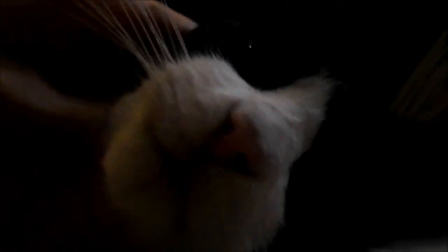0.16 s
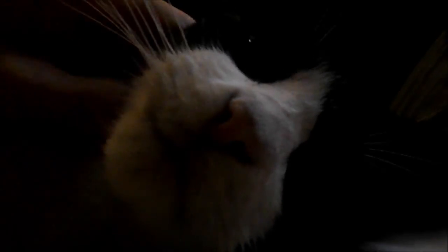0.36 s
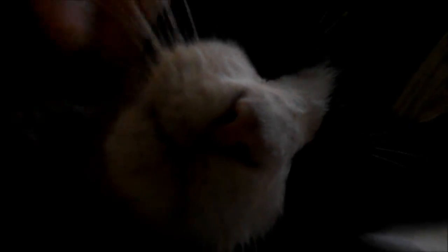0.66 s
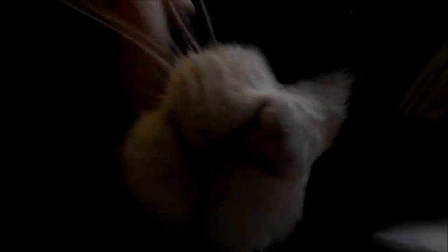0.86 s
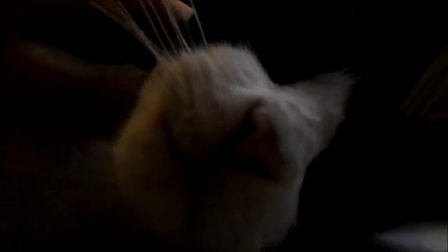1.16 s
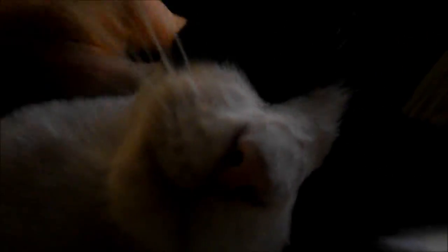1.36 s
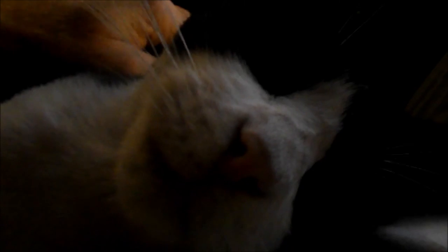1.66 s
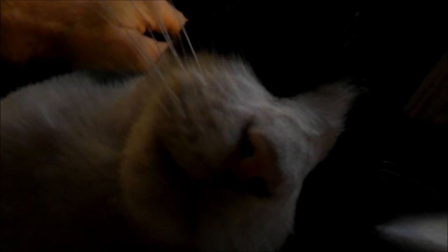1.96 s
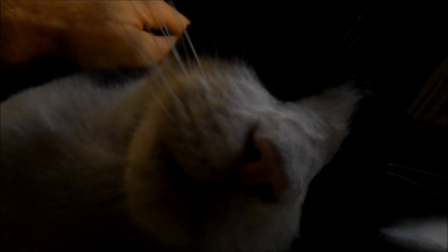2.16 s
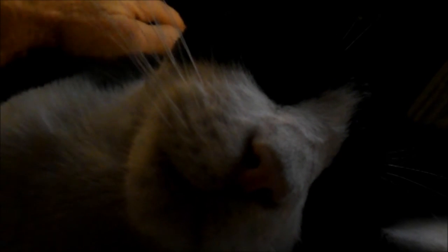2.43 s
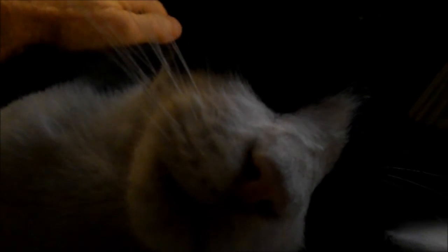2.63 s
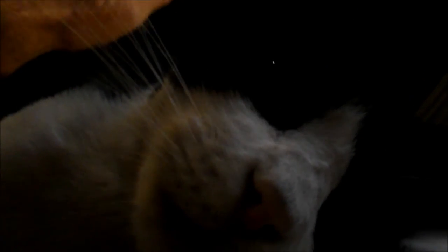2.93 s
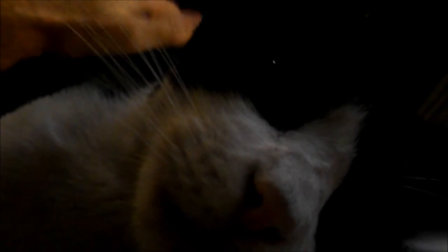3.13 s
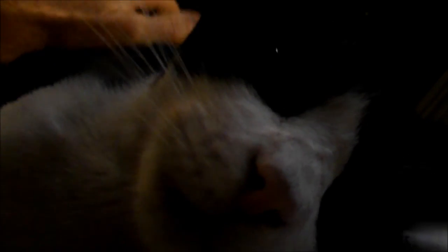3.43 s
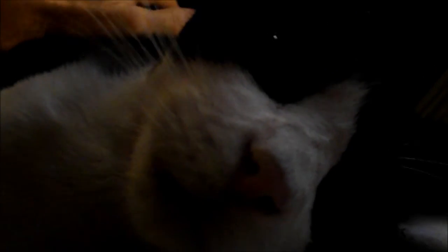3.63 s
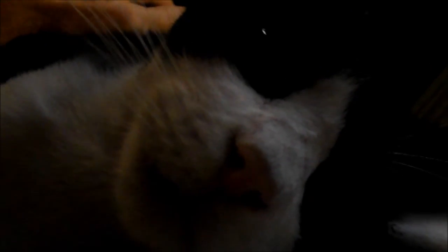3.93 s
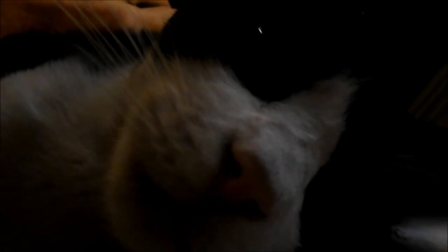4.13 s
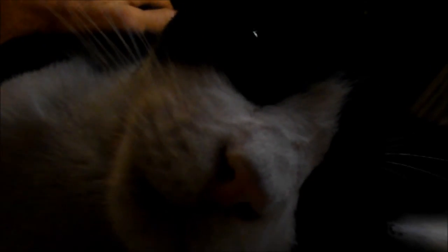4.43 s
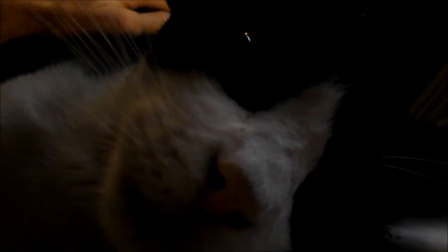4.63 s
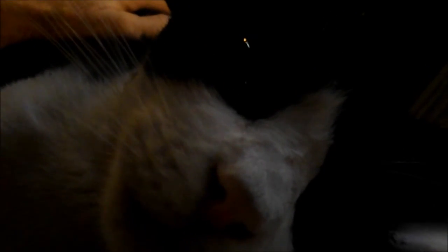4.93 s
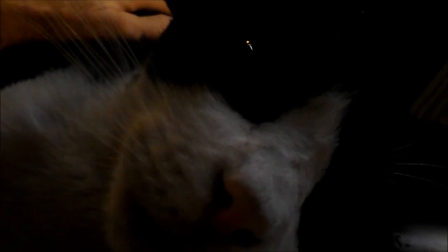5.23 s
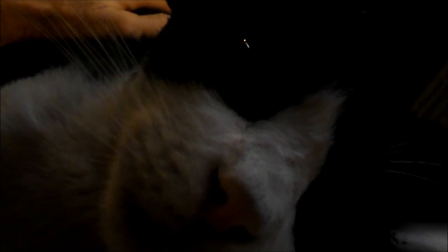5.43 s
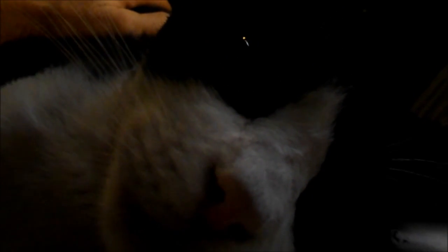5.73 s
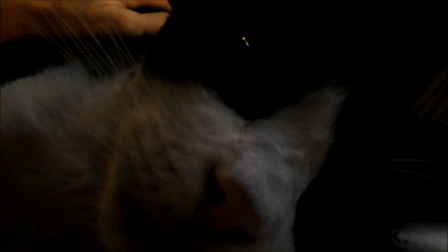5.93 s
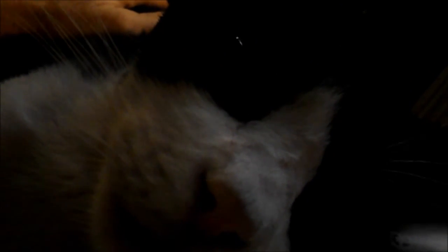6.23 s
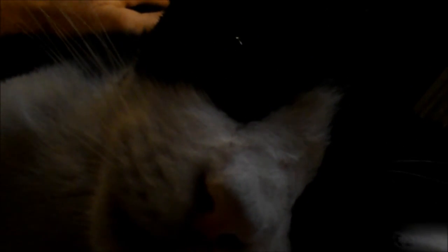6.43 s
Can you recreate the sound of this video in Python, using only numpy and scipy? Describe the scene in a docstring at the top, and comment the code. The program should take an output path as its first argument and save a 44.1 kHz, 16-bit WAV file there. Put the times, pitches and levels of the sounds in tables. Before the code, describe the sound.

A stroked cat purrs very close to the microphone for about six and a half seconds, dry and without echo. The purr is a rapid flutter, roughly 25 pulses a second, made of soft throaty pops, small chest thumps and puffs of slightly moist nasal hiss. Each breath begins with a few sharper snaps, settles into softer pulsing, then fades.

The tail of an out-breath is heard at the start. Short in-breaths come at about 0.3, 1.9, 3.7 and 5.6 seconds, each lasting around half a second or a little less. Longer out-breaths run from about 1.1 to 1.8, 2.8 to 3.6 and 4.7 to 5.5 seconds, with more prominent pops near 1.1 and 3 seconds. Another out-breath begins with snaps at 6.5 seconds, just as the sound ends. A faint steady hiss and low hum of the room lie underneath throughout.

```python
"""Soft snaps, throaty pops and puffs of nasal hiss: a stroked cat purrs close by in a quiet room.
Its larynx opens about 25 times a second on both the out- and the in-breath, chopping the airflow into
pulses that excite the resonances of throat, nose and chest. A breath starts with a few sharp snaps,
then settles into soft pops and puffs, and fades. A low hum and a steady hiss lie underneath."""
import sys
import numpy as np
from scipy import signal
from scipy.fft import rfft, irfft
from scipy.io import wavfile

SR = 44100
rng = np.random.default_rng(int(sys.argv[2]) if len(sys.argv) > 2 else 0)


def to_wav(sig):
    """Store sig (one row per channel, or 1-D mono) as 16-bit WAV at the path in sys.argv[1].

    Samples outside -1..1 are clipped; the rate is SR.
    """
    pcm = np.clip(np.atleast_2d(sig), -1, 1) * 32767
    pcm = np.round(pcm).astype(np.int16)
    wavfile.write(sys.argv[1], SR, pcm.T)  # frames by channels


N = 290574

# The run of snaps that starts a breath. Each row: first and last snap in seconds, growth of the gap per
# snap in seconds, direction (+1 out, -1 in), last snap's strength, crescendo and sharpness in dB,
# answering pop's peak in dB and pitch in Hz, flutter level and final hiss level in dB.
ONSETS = [(0.256, .335, 0.004, -1, 0.5, 5, -8.5, -31, 533, -44.5, -60.5),
          (1.0688, 1.143, -0.004, 1, -1, 4.5, -5.5, -27.5, 423, -59, -58),
          (1.932, 2.006, 0.0037, -1, -1, 0, -5.5, -31.5, 497, -45, -66),
          (2.8036, 2.9163, -0.0069, 1, 2, 5, -14, -38, 403, -52, -58),
          (3.7453, 3.822, .0067, -1, 1.1, 0.5, -6.5, -39, 510, -50, -68),
          (4.657, 4.7346, .004, 1, 2.5, 1, -13.5, -33.5, 430, -40, -56),
          (5.5689, 5.6906, -0.0011, -1, 0, 2.5, -8, -51, 470, -52, -71),
          (6.5081, 6.583, -0.0012, 1, 3, -0.5, -9.5, -30.5, 404, -39.5, -53)]
# The soft part of a breath. Each row: first and last puff in seconds, puffs per second, direction, crest
# in seconds, swell, fade, hiss level and flutter level in dB, pop pitch in Hz, nostril ring in dB.
BREATHS = [(0.016, 0.134, 24, 1, .03, -1.5, 3, -58, -53.5, 493, -4.5),
           (0.4, 0.528, 24, -1, 0.515, 10, 1.5, -50.5, -54, 425, -0.5),
           (1.159, 1.813, 24.6, 1, 1.44, 3, 5, -53, -49.5, 420, -7.5),
           (2.154, 2.278, 23.8, -1, 2.195, 1, 10, -49.5, -47, 240, -8.5),
           (2.922, 3.612, 24.6, 1, 3.13, 7, 8.5, -51, -48, 367, -14),
           (3.886, 4.021, 22.7, -1, 3.975, 11, 2, -48, -50.5, 400, -14),
           (4.751, 5.484, 24.8, 1, 5.18, 2, 7.5, -52, -49, 390, -10.5),
           (5.748, 6.047, 23.2, -1, 5.79, 4, 6.5, -47.5, -53.5, 290, -9.5)]
# Resonances and antiresonances of throat and nose. Each row: centre in Hz, width in Hz, gain in dB.
THROAT = [(566.7, 268, 16), (764, 145.5, -34), (959, 383, 13), (1710, 290, 4), (2660, 143, -15),
          (3297, 290, 6), (3820, 280, 7.5), (4840, 4800, 2), (6240, 850, 16.5), (7220, 520, 10.5),
          (8450, 460, 9.5)]
# The resonance of the chest. Each row: centre in Hz, width in Hz, gain in dB.
CHEST = [(198, 113, 15)]
SNAPS_PER_S, TISSUE_JITTER_S = 26, 0.002085
TIME = np.arange(N) / SR


def from_db(db):
    """Decibels to gain."""
    return 10 ** (np.asarray(db) / 20)


def rms_one(x):
    """Scale to an rms of 1."""
    return x / np.sqrt(np.mean(x ** 2) + 1e-20)


def cut(x, hz, kind, order=2):
    """Butterworth low- or high-pass."""
    return signal.sosfilt(signal.butter(order, hz, kind, fs=SR, output="sos"), x + 1e-18)


def resonate(x, peaks):
    """A chain of peaks and notches."""
    for hz, width, db in peaks:
        height, a, c = np.sqrt(from_db(db)), np.tan(np.pi * width / SR), -2 * np.cos(2 * np.pi * hz / SR)
        x = signal.lfilter([1 + a * height, c, 1 - a * height], [1 + a / height, c, 1 - a / height], x + 1e-18)
    return x


def noise(spectrum):
    """Noise of a given colour, rms 1."""
    hz, db = np.transpose(spectrum)
    bins = np.maximum(np.fft.rfftfreq(N, 1 / SR), 1)
    return rms_one(irfft(rfft(rng.standard_normal(N)) * from_db(np.interp(np.log(bins), np.log(hz), db)), N))


def add(track, s, sound):
    """Mix a short sound into a track from time s on."""
    at = int(np.clip(round(s * SR), 0, N - 1))
    track[at:at + len(sound)] += sound[:N - at]


def room(hiss_db=-56.5):
    """Stationary background: broadband hiss plus the pure tones of a low hum."""
    # The room's hiss. Each row: frequency in Hz, relative spectral density in dB.
    room_spectrum = [(20, -8), (40, -24), (70, -7.5), (90, -8.5), (140, -3.5), (220, 3), (330, -2.5),
                     (520, -5), (720, -10), (1500, -14), (3500, -15.5), (6500, -14), (8500, -15),
                     (10000, -15.5), (11000, -24)]
    # The hum. Each row: frequency in Hz, rms level in dB.
    hum_tones = [(54.9, -71), (120.1, -71)]
    hum = sum(np.sqrt(2) * from_db(db) * np.sin(2 * np.pi * (hz * TIME + rng.random()))
              for hz, db in hum_tones)
    return from_db(hiss_db) * noise(room_spectrum) + hum


def beats(first, last, per_s, growth_s=0):
    """Opening times of the larynx, an oscillator whose period grows by growth_s each cycle."""
    k = np.arange(round((last - first) * per_s) + 1)
    return first + (last - first) * k / k[-1] + growth_s * k * (k - k[-1]) / 2


def soft_openings():
    """The periodic pulse train of the soft purr, as (seconds, direction)."""
    return [(s, direction) for first, last, per_s, direction, *_ in BREATHS
            for s in beats(first, last, per_s)]


def after_snaps(delay_s):
    """The pulse train of the snapping runs, delayed, as (seconds, direction)."""
    return [(s + delay_s, direction) for first, last, growth_s, direction, *_ in ONSETS
            for s in beats(first, last, SNAPS_PER_S, growth_s)]


def openings():
    """The larynx is a valve: each opening passes a puff, a little late after a snap."""
    return soft_openings() + after_snaps(delay_s=0.0096)


def throat(x, low_hz=175, tilt_hz=600):
    """Source and filter: the small airway radiates little bass, resonates and tilts the treble down."""
    return resonate(cut(cut(x, low_hz, "high"), tilt_hz, "low", order=1), THROAT)


def snaps(edge_hz=900, sharpness_spread_db=0.3):
    """Sticking folds part with a pressure jump: upwards on the out-breath, downwards on the in-breath."""
    # Snaps outside the runs. Each row: time in seconds, strength in dB, sharpness (treble gain) in dB.
    lone_snaps = [(.0127, -10, -14), (.0941, -15.5, 1), (.4396, -17, -4), (.6478, -13, 0),
                  (1.1566, -3.5, -9), (1.2386, -10.5, -7), (1.2785, -7, -14), (1.4378, -8, -17),
                  (1.5652, -8, -12), (1.5989, -8.5, -10), (1.6464, -6.5, -8), (3.0837, -0.5, -14),
                  (3.1192, -8.5, -6), (3.1632, -3, -10.5), (3.9646, -14.5, 3.5), (4.1858, -13.5, -1),
                  (4.8735, -4.5, -9), (4.995, -3, -14), (5.2418, -1, -10.5), (6.2292, -9.5, -5)]
    events = list(lone_snaps)
    for first, last, growth_s, _, db, crescendo_db, sharp_db, *_ in ONSETS:
        for s in beats(first, last, SNAPS_PER_S, growth_s):
            strength_db = db - crescendo_db * (last - s) / (last - first)
            events.append((s, strength_db, sharp_db - sharpness_spread_db * rng.standard_normal()))
    out, click = np.zeros(N), signal.unit_impulse(SR // 100)
    body = cut(click, edge_hz, "low", order=1)
    cycles = openings()
    for s, db, sharp_db in events:
        _, direction = min(cycles, key=lambda cycle: abs(cycle[0] - s))
        add(out, s, direction * from_db(db) * (body + from_db(sharp_db) * (click - body)))
    return throat(out)


def arch(times, db, attack_s, release_s=0.068, rest_db=-71):
    """Attack and release: a level in dB rises from rest, passes the given points and sinks back."""
    return np.interp(TIME, [times[0] - attack_s, *times, times[-1] + release_s], [rest_db, *db, rest_db])


def airflow(attack_s=0.053, hiss_rise_db=3, flutter_rise_db=13):
    """Breathing effort sets the slow envelopes of nasal hiss and throat flutter, both in dB."""
    hiss, rasp = [], []
    for first, last, *_, flutter_db, hiss_db in ONSETS:
        hiss.append(arch([first, last], [hiss_db - hiss_rise_db, hiss_db], attack_s))
        times = [first + attack_s / 2, (first + last) / 2, last]
        rasp.append(arch(times, [flutter_db - flutter_rise_db, flutter_db, flutter_db], attack_s))
    for first, last, _, _, crest, swell_db, fade_db, hiss_db, flutter_db, *_ in BREATHS:
        times = [first, np.clip(crest, first, last), last]
        effort_db = np.array([-swell_db, 0, -fade_db])
        hiss.append(arch(times, hiss_db + effort_db, attack_s))
        rasp.append(arch(times, flutter_db + effort_db, attack_s))
    return np.max(hiss, axis=0), np.max(rasp, axis=0)


def puffs(cycles, out_s, in_s, uneven_db, closing=1, jitter_s=0.002):
    """Gaussian flow pulses of half-width out_s or in_s, by direction; closing scales the falling side."""
    flow = np.zeros(N)
    for s, direction in cycles:
        late, size = rng.standard_normal(2)
        top = s + jitter_s * late
        width = out_s if direction > 0 else in_s
        near = slice(*np.searchsorted(TIME, [top - 10 * width, top + 10 * width]))
        t = TIME[near] - top
        bell = np.exp(-.5 * (t / np.where(t < 0, width, closing * width)) ** 2)
        flow[near] += from_db(uneven_db * size) * bell
    return flow


def shot_noise(per_s):
    """A Poisson process: independent impulses of random sign."""
    return (rng.random(N) < per_s / SR) * rng.choice([-1, 1], N)


def nose(level_db, leak=0.091, grain=0.28, ring_hz=3925, ring_width_hz=400, tick_db=22):
    """Amplitude modulation: each puff drives hiss, crackle and wet ticks in the moist nostrils."""
    # The hiss at the nostrils. Each row: frequency in Hz, relative spectral density in dB.
    nostril_spectrum = [(700, -3), (1000, -48), (1400, -2.5), (2700, -14), (3600, -26), (4600, -14),
                        (5500, -6), (6300, 8), (6800, 0), (7400, 2.5), (8200, -11.5), (8900, -0.5),
                        (9400, -16), (10000, -30)]
    pulses = puffs(openings(), out_s=0.0071, in_s=0.0034, uneven_db=1.1, closing=0.77)
    flow = from_db(level_db) * (leak + pulses)
    crackle = rms_one(np.exp(grain * rms_one(cut(rng.standard_normal(N), 560, "low"))))
    narrow_nostril = signal.iirpeak(ring_hz, ring_hz / ring_width_hz, fs=SR)
    ring = rms_one(signal.lfilter(*narrow_nostril, rng.standard_normal(N)))
    _, _, _, _, crests, *_, ring_db = np.transpose(BREATHS)
    narrowing = from_db(np.interp(TIME, crests, ring_db))
    ticks = shot_noise(per_s=45) * from_db(tick_db) * flow
    ticks = cut(cut(ticks, 1100, "high"), 2300, "low", order=1)
    return flow * crackle * (noise(nostril_spectrum) + narrowing * ring) + resonate(ticks, THROAT)


def throat_lag(direction):
    """Delay in seconds: the throat moves after the nose's puff going out, before it coming in."""
    return 0.004475 if direction > 0 else -0.00403


def flutter(level_db, between=0.2, churn=0.66, rebound=0.54, rebound_s=0.0245, knock=2.12):
    """Impulse excitation: soft tissue knocks, flaps and rebounds with each puff; the chest resonates."""
    flaps = shot_noise(per_s=1100)
    moves = [(s + throat_lag(direction), direction) for s, direction in soft_openings()]
    main = puffs(moves, out_s=0.0037, in_s=0.005, uneven_db=0.4)
    rebounds = [(s + rebound_s, direction) for s, direction in soft_openings()]
    second = puffs(rebounds + after_snaps(delay_s=0.0188), out_s=0.0022, in_s=0.0031, uneven_db=4.5)
    blows = flaps * (between + churn * main + rebound * second)
    for s, direction in moves:
        add(blows, rng.normal(s, 0.00178), np.array([knock * direction]))
    voiced = throat(np.array([flaps, blows * from_db(level_db)]))
    muffled = cut(cut(voiced, 1500, "low", order=4), 135, "high", order=4)
    steady, pulsed = resonate(muffled, CHEST + [(1040, 190, 1.1)])
    return pulsed / steady.std()   # level_db is the level that unbroken flapping would have


def thumps(flutter_db, hz=179, decay_s=0.0039, over_flutter_db=-4.5, uneven_db=3, lead_s=0.003):
    """Damped oscillation: each soft opening shakes the chest for a cycle or two."""
    out, t = np.zeros(N), np.arange(SR // 20) / SR
    thump = t / decay_s * np.exp(1 - t / decay_s) * np.sin(2 * np.pi * hz * t)
    for s, direction in soft_openings():
        db = np.interp(s, TIME, flutter_db) + over_flutter_db + uneven_db * rng.standard_normal()
        start = rng.normal(s + throat_lag(direction) - lead_s, TISSUE_JITTER_S)
        add(out, start, from_db(db) * thump)
    return out


def answering_pops(delay_s=0.013, slip_s=0.0075, last_db=-13, spread_octaves=0.17):
    """Phase slip: a pop follows each snap of a run, later each time, as (seconds, peak dB, Hz)."""
    events = []
    for first, last, growth_s, *_, db, hz, _, _ in ONSETS:
        run = beats(first, last, SNAPS_PER_S, growth_s)
        for k, s in enumerate(run):
            peak_db = db + last_db * (k == len(run) - 1)
            pitch_hz = hz * 2 ** (spread_octaves * rng.standard_normal())
            events.append((s + delay_s + k * slip_s, peak_db, pitch_hz))
    return events


def puff_pops(flutter_db, delay_s=0.0021, over_flutter_db=5, spread_db=4, spread_octaves=0.26):
    """Jitter and shimmer: each soft puff brings a small, irregular pop, as (seconds, peak dB, Hz)."""
    events = []
    for first, last, per_s, direction, *_, hz, _ in BREATHS:
        for s in beats(first, last, per_s):
            late, size, pitch = rng.standard_normal(3)
            peak_s = s + throat_lag(direction) + delay_s + TISSUE_JITTER_S * late
            peak_db = np.interp(s, TIME, flutter_db) + over_flutter_db + spread_db * size
            events.append((peak_s, peak_db, hz * 2 ** (spread_octaves * pitch)))
    return events


def pops(flutter_db, width_s=0.0012, glide_per_s=35, overtone=0.33, push_s=0.00022, push_below_hz=490):
    """Transient response: each pop is a rising tone burst that dies in the ring of throat and chest."""
    # Pops that stand out of the purr. Each row: time in seconds, peak level in dB, pitch in Hz.
    loud_pops = [(.017, -29.5, 486), (.063, -39.5, 500), (.103, -32.5, 490), (.302, -33, 387),
                 (1.112, -27, 515), (1.774, -38.5, 463), (2.03, -36.5, 483), (2.282, -40, 390),
                 (2.971, -37, 390), (3.009, -33, 455), (3.049, -32, 436), (3.09, -28.5, 450),
                 (3.332, -37.5, 377), (3.623, -37.5, 343), (4.719, -31.5, 540), (4.838, -32.5, 395),
                 (4.86, -35, 455), (4.884, -35, 298), (5.084, -37, 418), (5.163, -34, 464),
                 (5.401, -41.5, 407), (6.043, -39.5, 373)]
    events = list(loud_pops) + answering_pops() + puff_pops(flutter_db)
    out, t = np.zeros(N), np.arange(-SR // 125, SR // 40) / SR
    swell = np.exp(-.5 * (t / width_s) ** 2)
    push = 1.44 * np.exp(-.5 * ((t + width_s) / push_s) ** 2)
    for s, db, hz in events:
        phase = 2 * np.pi * (rng.random() + hz * (t + .5 * glide_per_s * t ** 2))
        tone = swell * (np.sin(phase) + overtone * np.sin(2 * phase))
        lowness = np.clip(10 * (1 - hz / push_below_hz), 0, 1)   # only low pops start with a dull push
        pop = resonate(throat(lowness * push + tone), CHEST)
        size = np.abs(signal.hilbert(pop))
        add(out, s - size.argmax() / SR, from_db(db) * pop / size.max())
    return out


def scene():
    """Direct sound: the cat is so close that it sounds dry, and the same in both ears."""
    hiss_db, flutter_db = airflow()
    mix = room() + snaps() + nose(hiss_db) + flutter(flutter_db) + thumps(flutter_db) + pops(flutter_db)
    return np.tile(mix, (2, 1))


def record(dry):
    """Frequency response: the microphone has a narrow treble notch, and a steep low-pass cuts the top."""
    # The notch. Each row: centre in Hz, width in Hz, gain in dB.
    mic_notch = [(7690, 140, -18)]
    top = signal.cheby2(16, 50, 11380, fs=SR, output="sos")   # 50 dB down from 11380 Hz on
    return signal.sosfilt(top, resonate(dry, mic_notch))


dry = scene()
out = record(dry)
to_wav(out)
```